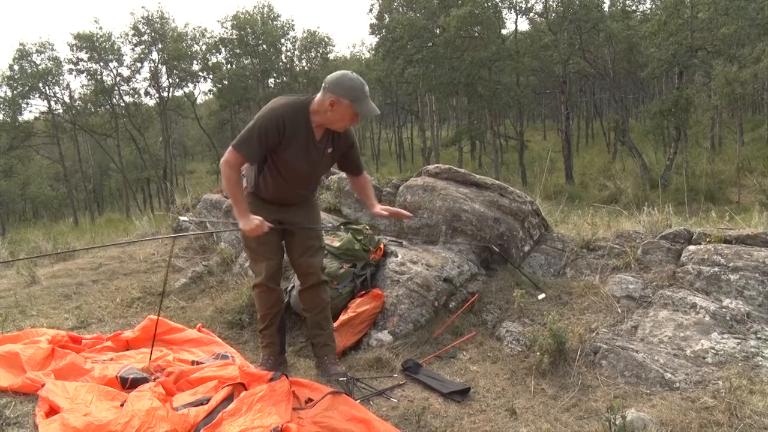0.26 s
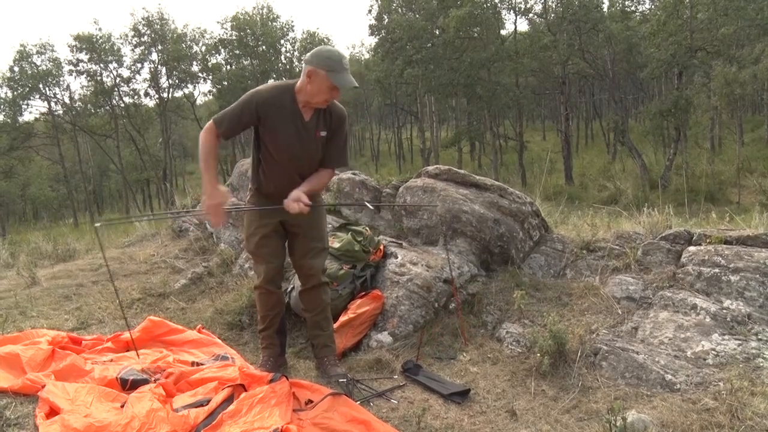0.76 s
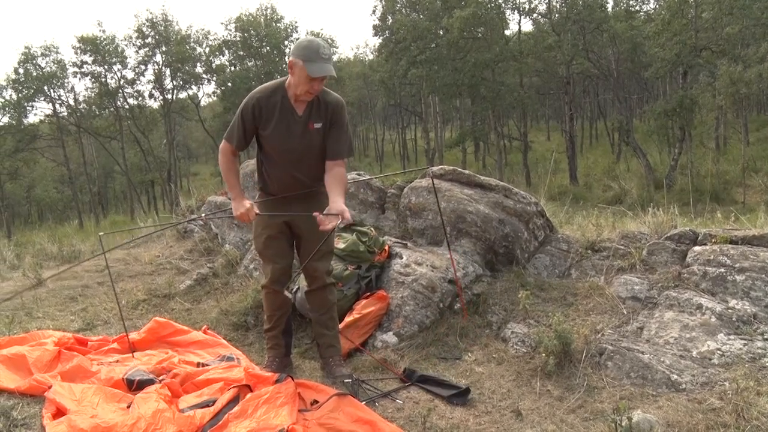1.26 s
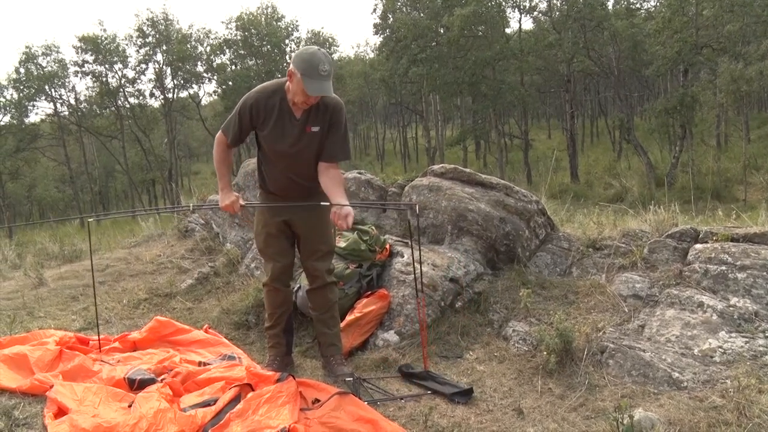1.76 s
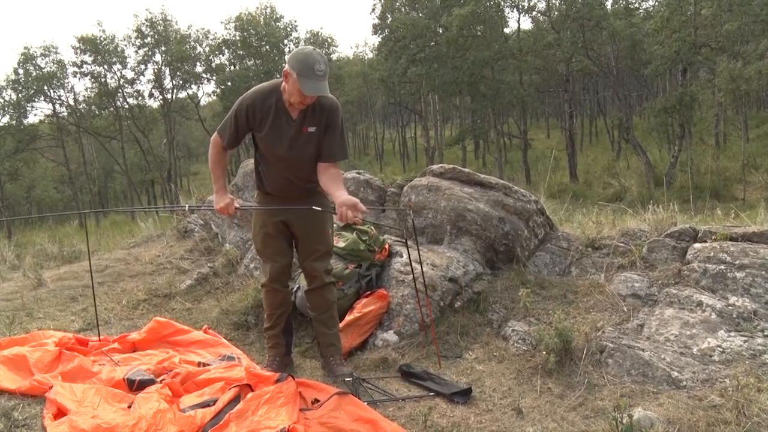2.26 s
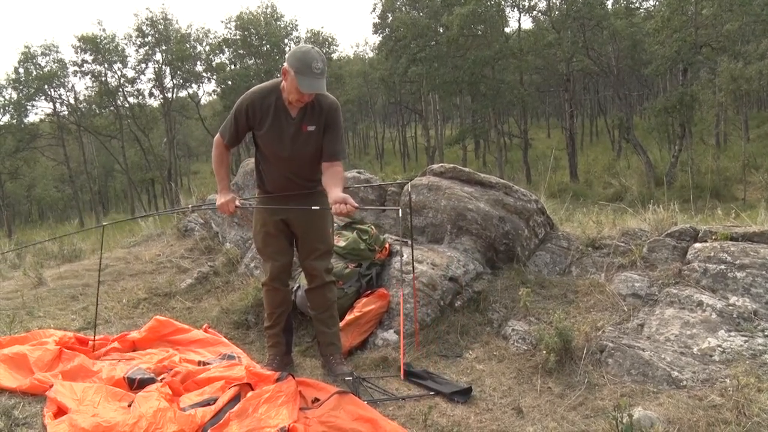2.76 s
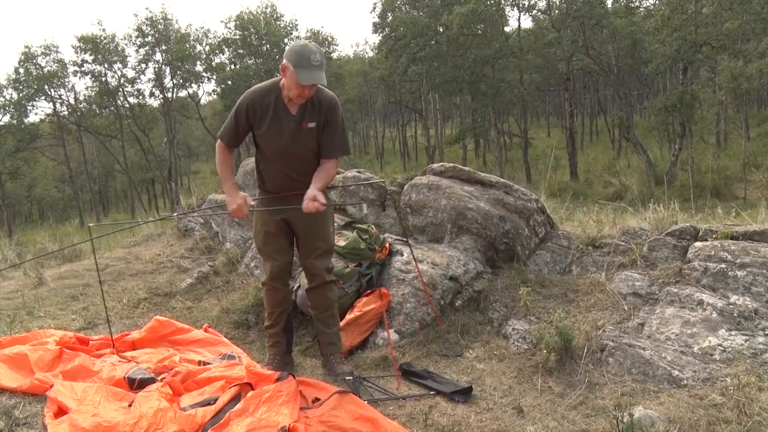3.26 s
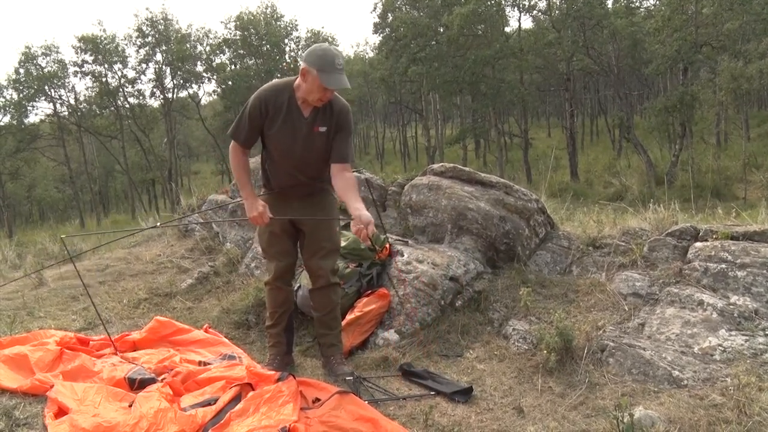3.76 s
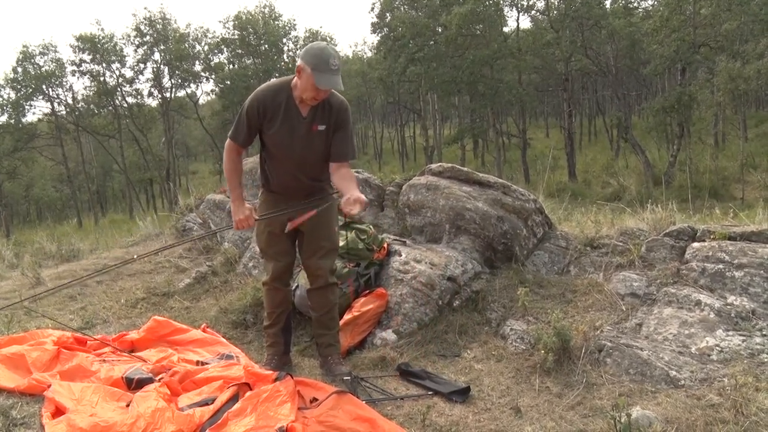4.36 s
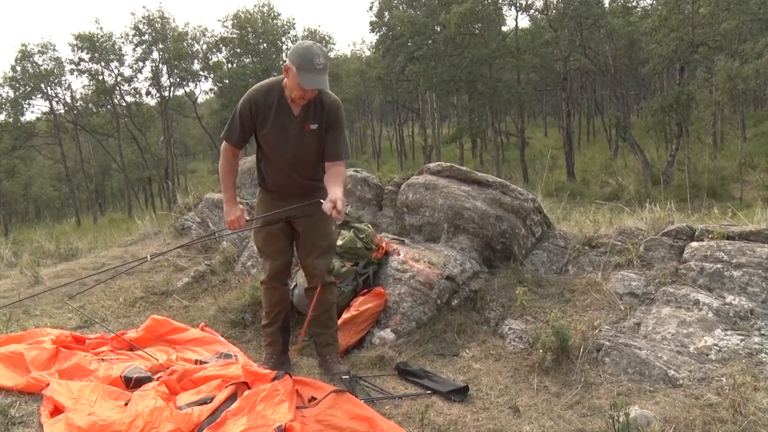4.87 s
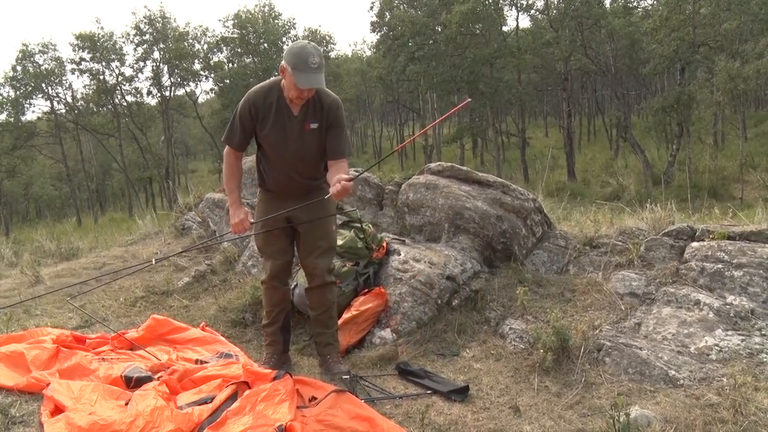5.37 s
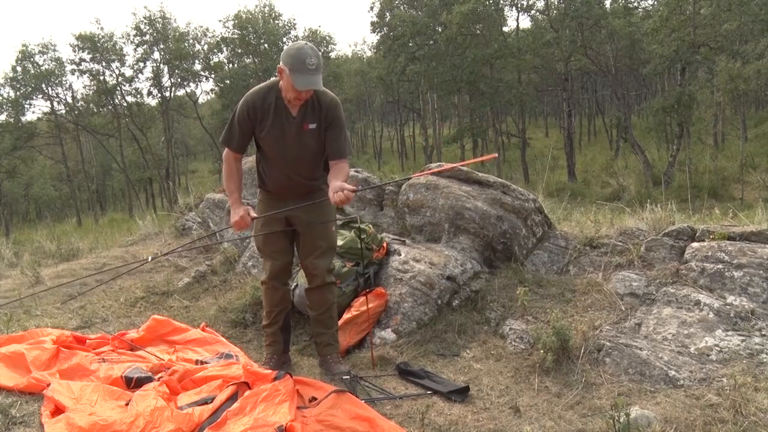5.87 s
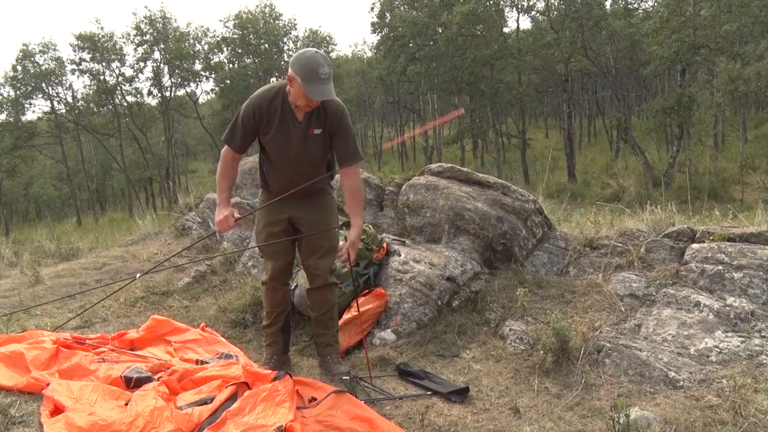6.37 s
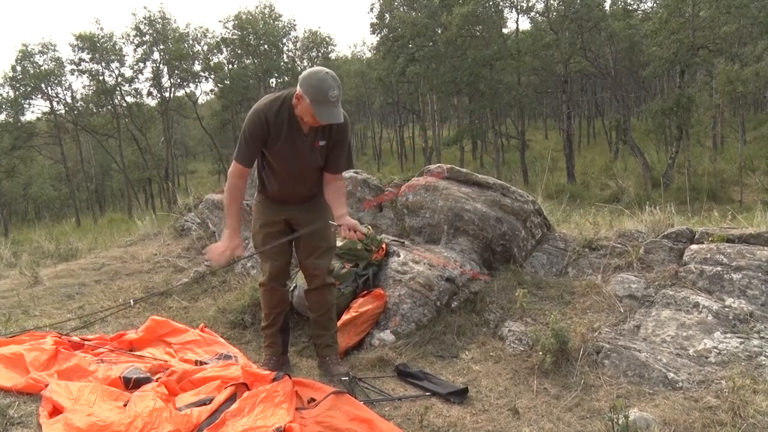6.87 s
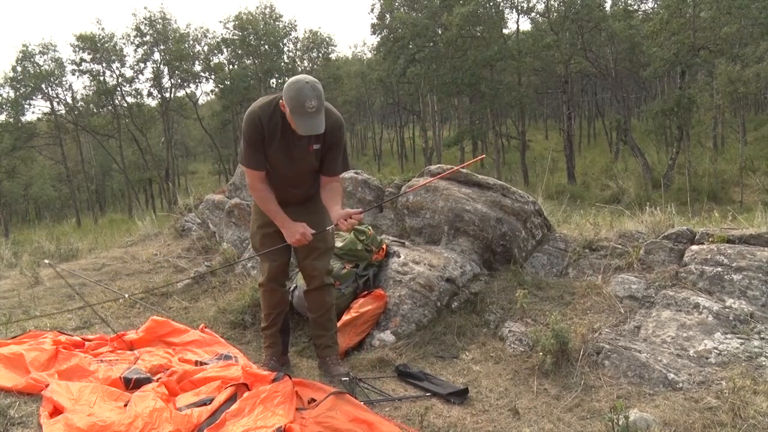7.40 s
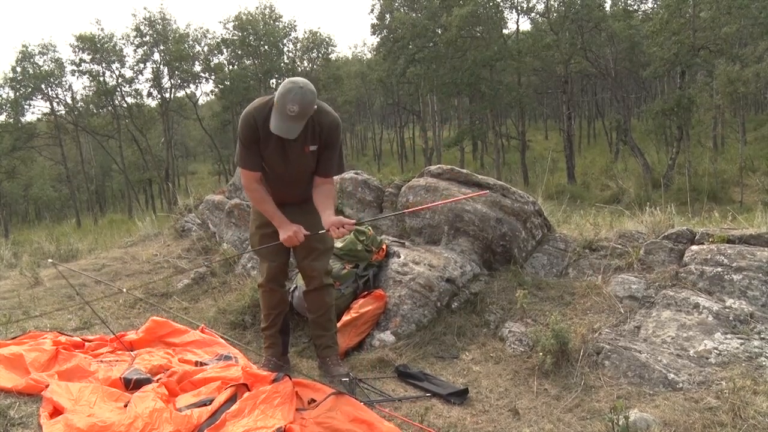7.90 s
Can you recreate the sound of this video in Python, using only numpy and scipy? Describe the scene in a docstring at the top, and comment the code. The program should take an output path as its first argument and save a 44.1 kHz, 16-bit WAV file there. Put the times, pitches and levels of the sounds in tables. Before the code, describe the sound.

Thin metal tent poles click and rattle together in uneven bursts, with close cloth rustle, hand rubs and dull bumps in a quiet outdoor clearing.

```python
"""Thin aluminium tent pole sections click and rattle as they are joined in a quiet clearing.
Each click is a short noise chatter filtered by tube modes, heard direct, off the ground and scattered.
A microphone on the body also picks up dull jolts, grainy scuffs and filtered noise for rustling cloth.
A hand slides along the tube as a resonant rub with thin squeaks, and light catches sound the air inside.
Behind it lie still air, made of shaped noise, and a faint low hum, a wavering sine."""
import sys
import numpy as np
from scipy import signal
from scipy.fft import rfft, irfft
from scipy.io import wavfile
from scipy.ndimage import uniform_filter1d

SR = 44100
rng = np.random.default_rng(int(sys.argv[2]) if len(sys.argv) > 2 else 0)


def materialize(psi):
    """Save the field psi as 16-bit PCM at rate SR to the path in sys.argv[1].

    A 1-D psi becomes a single channel; in a 2-D psi each row is a channel.
    """
    bounded = np.clip(np.atleast_2d(psi).T, -1, 1)
    quanta = np.round(bounded * 32767).astype(np.int16)
    wavfile.write(sys.argv[1], SR, quanta)


N = 358974

# Still air. Each row: frequency in Hz, relative level in dB per Hz.
AIR_SPECTRUM = [(12, -37), (20, -13), (50, -1), (81, 2.5), (181, -9.5), (510, -13.5), (1690, -26),
                (2800, -37), (3400, -41.5), (4630, -28.5), (5620, -40.5), (14500, -31.5), (15800, -29)]
AIR_DB = -65
# Low hum. Each row: time in seconds, pitch in Hz, level in dB before the waver.
HUM_CURVE = [(0, 73.4, -56), (.4, 75.6, -69), (.7, 75.1, -60), (.95, 75.1, -58), (1.3, 73.9, -67.5),
             (2.75, 73.5, -68.5), (3, 73.7, -61.5), (3.599, 74.2, -59.5), (4.601, 73.2, -62.5),
             (5.2, 74.4, -61), (5.7, 73.2, -58.5), (6.9, 72.1, -56), (7.5, 71.2, -57), (7.75, 72.1, -64.5),
             (8.14, 75.2, -57.5)]

# Strokes of arms and hands. Each row: peak time in seconds, rise in seconds, fall in seconds,
# cloth on the microphone in dB, hand on the tube in dB, crisp rustle in dB.
STROKES_OF_ARMS = [(.107, 0.27, 0.1, -58.5, -58.5, -50.5), (.307, 0.59, 0.34, -59.5, -70.5, -69),
                   (.6, 0.29, 0.28, -61, -65.5, -63), (.955, 0.14, 0.22, -58.5, -57.5, -55),
                   (1.06, 0.093, 0.12, -56.5, -59.5, -57), (1.255, 0.19, 0.091, -57, -57, -56),
                   (1.47, 0.25, 0.97, -60.5, -72, -62.5), (1.7, 0.21, 0.05, -79, -59, -59),
                   (1.893, 0.084, 0.054, -62.5, -62, -68), (2.01, 0.027, 0.12, -72, -58, -60),
                   (2.115, 0.1, 0.0092, -71, -60.5, -52.5), (2.42, 0.04, 0.073, -73, -62.5, -70),
                   (2.7, 0.6, 0.9, -68.5, -94.5, -92), (2.782, 0.048, 0.095, -61, -56, -59),
                   (2.956, 0.039, 0.036, -53, -53, -56), (3.04, 0.048, 0.15, -57, -55, -57),
                   (3.235, 0.15, 0.12, -58.5, -61.5, -68), (3.36, 0.2, 0.063, -62, -85, -63),
                   (3.774, 0.21, 0.078, -61.5, -67, -69), (3.993, .1, 0.056, -64, -68, -64),
                   (4.1, 0.57, 0.31, -63, -77, -78), (4.421, 0.35, 0.08, -62, -60.5, -64),
                   (4.722, 0.033, 0.089, -76, -64.5, -67), (4.886, 0.026, 0.034, -58.5, -58.5, -65),
                   (5.25, 1, 0.29, -66.5, -97, -90), (5.925, 0.048, 0.06, -76, -61, -52.5),
                   (5.99, 0.1, 0.23, -65.5, -64.5, -68), (6.24, 0.21, 0.38, -67.5, -67.5, -63),
                   (6.428, 0.085, 0.097, -58.5, -68, -66), (6.731, 0.066, 0.095, -85, -63.5, -60),
                   (7.25, 0.88, 0.15, -64, -68.5, -61), (7.345, 0.037, 0.14, -54.5, -50.5, -52.5),
                   (7.5, 0.051, 0.16, -60, -63.5, -62.5), (7.826, 0.082, 0.075, -62, -63, -62.5),
                   (8.06, 0.11, 0.29, -64, -63, -59)]
# Resting levels between strokes, in dB: cloth, rub and rustle.
REST_LEVELS_DB = (-82.5, -73, -72.5)
STROKE_DROP_DB, STROKE_ROUND = 17, 1.49  # level lost over one rise or fall time; how rounded the top is
# Colours of soft cloth, of the rub on the tube and of the fine rustle.
# Each row: frequency in Hz, relative level in dB per Hz.
CLOTH_SPECTRUM = [(60, -35.5), (110, -4), (280, -6.5), (540, -4), (750, -7.5), (1300, -9), (1800, -13),
                  (3000, -51)]
RUB_SPECTRUM = [(900, -3.5), (1500, -11), (2100, 3), (2450, 1), (2800, 2), (3300, -5), (4400, -5.5),
                (5500, -20.5), (8000, -26.5)]
RUSTLE_SPECTRUM = [(2500, -33), (4500, -1.5), (6000, 3), (10000, 1.5), (15800, 3.5)]

# Clothing dragging over the microphone as the body straightens. Each row: time in seconds, level in dB.
DRAG_LEVEL = [(.045, -50.5), (.1, -48), (.145, -45.5), (.19, -51), (.215, -66)]
# Resonances of the drag. Each row: frequency in Hz, width of each of two passes in Hz, relative level in dB.
DRAG_RESONANCES = [(90, 60, 0.5), (191, 120, -6)]

# Hand sliding along the pole. Each row: time in seconds, level in dB.
SLIDE_LEVEL = [(6.88, -59), (6.95, -61), (7.1, -57), (7.25, -56), (7.4, -59.5), (7.6, -60), (7.78, -60.5),
               (7.86, -94)]
# Resonances of the slide. Each row: frequency in Hz, width of the first pass in Hz, relative level in dB.
SLIDE_RESONANCES = [(310, 154, 6), (387, 38, 0), (670, 150, 1), (872, 52, 3), (1500, 640, -10),
                    (6200, 1800, -18)]
# Thin wavering squeaks of skin on the tube, one table each.
# Each row: time in seconds, pitch in Hz, level in dB.
SQUEAK_CURVES = [
    [(4.992, 5060, -63), (5.005, 5130, -66), (5.025, 4970, -80)],
    [(6.928, 11000, -72), (6.945, 13100, -71), (6.97, 14100, -71), (6.995, 13700, -71), (7.03, 14700, -72),
     (7.1, 14960, -76)],
    [(7.295, 13000, -70), (7.317, 11900, -69)],
    [(7.375, 14000, -70), (7.415, 13900, -70), (7.432, 12400, -69), (7.458, 12900, -68), (7.48, 11800, -78)],
    [(7.5, 13200, -76), (7.526, 12760, -73), (7.544, 11870, -73), (7.568, 12850, -73), (7.605, 12700, -72),
     (7.645, 11250, -74), (7.694, 11400, -73), (7.728, 10780, -72), (7.745, 11240, -71), (7.778, 9950, -74)],
]
# A fainter tone at two thirds of the pitch comes out when a high squeak sinks below this.
LOWER_DB, LOWER_BELOW_HZ = -2, 11500

# Soft scuffs of hand, cloth and cord. Each row: start in seconds, peak in dB, centre in Hz,
# spread in octaves, length in ms.
SCUFF_EVENTS = [(0.122, -29, 3020, 1.8, 16), (0.3028, -41, 1730, 0.69, 23), (0.5964, -39.5, 4390, 2.4, 10),
                (0.8032, -44, 8960, 2, 33), (0.9648, -38, 3940, 1.3, 5.4), (1.171, -43, 12900, 0.72, 7.3),
                (3.112, -39, 4860, 1.2, 9.8), (3.1606, -44, 2730, 1.5, 22), (3.2218, -47.5, 2590, 1.3, 19),
                (3.778, -42, 9240, 1.5, 13), (3.977, -40, 10000, 1.5, 14), (4.253, -50, 1790, 2.8, 17),
                (4.326, -48, 2810, 1.03, 13), (5.3104, -49.5, 2630, 2.4, 2.9),
                (6.101, -43.5, 2680, 2.1, 10), (6.2512, -41, 11700, 1.5, 8.4),
                (7.214, -46.5, 2500, 0.36, 6), (7.2953, -44, 2200, 0.39, 5.6),
                (7.3265, -26.5, 6960, 1.9, 10), (7.3385, -32, 4500, 1.1, 6.3), (7.347, -40, 8000, 1.5, 4),
                (7.357, -40, 5500, 0.86, 6), (7.3695, -35, 7540, 0.7, 10), (7.3934, -34.5, 10400, 2.5, 9.8),
                (7.4235, -36, 7000, 1.4, 7.1), (7.437, -39, 5000, 1.2, 7), (7.4906, -40.5, 2040, 3, 8.9),
                (7.5958, -45, 4670, 1.5, 11), (7.834, -41, 14800, 0.48, 6)]

# Jolts through arm and clothing into the microphone. Each row: start in seconds, swing peak in dB,
# push in ms (never under 0.5), wobble in Hz, wobble in dB against the swing.
JOLT_EVENTS = [(0.039, -35, 1.4, 128, -10), (.148, -38, 2, 82, 5.5), (.519, -36.5, 1.26, 110, -6),
               (1.444, -21, 1.1, 384, -3), (1.975, -45.5, 2.2, 197, -4), (3.077, -29, 0.42, 714, 10.5),
               (3.744, -29, 0.42, 520, -8.5), (3.941, -24, 1.55, 507, -2), (5.945, -37, 0.82, 396, -6),
               (7.319, -40, 0.86, 438, 12.5), (7.3255, -51, 0.85, 330, 3), (8.068, -27, 0.8, 417, -11)]

# Light catches that sound the air inside one section. Each row: start in seconds, peak in dB,
# favoured overtone in Hz, spread in Hz.
CATCH_EVENTS = [(3.63, -53, 3000, 2500), (3.6535, -53, 2420, 400), (3.672, -50, 4200, 2500),
                (3.689, -46, 2900, 1500), (3.707, -51, 3800, 1500), (3.727, -51, 3600, 1500),
                (3.75, -31, 2810, 1600), (3.806, -51, 1830, 300)]
# Tones of the air in one section, in Hz.
AIR_COLUMN_HZ = [1910, 2380, 2990, 3700, 4160, 5060, 5470, 5900, 6510]
PIPE_T60_S = 0.08  # at the second tone; higher tones die sooner

# Pole clicks. Each row: start in seconds, peak in dB, favoured ring or rings in Hz,
# brightness in dB per octave, low knock in dB, ground echo in dB (reached in the treble).
CLICK_EVENTS = [(0.5194, -41, 3360, -0.5, 13, 5), (0.543, -34, 3800, -3, -47, 2),
                (0.6754, -33, 2740, -6.5, -35, -18), (0.7208, -42.5, 5860, -7.5, -50, -15),
                (0.822, -37, 9000, -2, -28, 1), (1.4428, -10.5, (12270, 8800, 1600, 6500), -2.5, 0, -6),
                (1.5139, -25, (10900, 9300, 4950, 7800), 0.5, 2, -1.5),
                (1.565, -24.5, (2900, 6460, 4480, 8200), -0.5, 2, -23), (1.593, -33, (5000, 3100, 5900),
                0, 5, -16), (1.674, -32, 8230, -8, -19, -21),
                (1.68, -16.5, (10300, 8340, 3100, 4930, 12300), 1.5, 4, -23),
                (1.7215, -43.5, 2900, -4, -12, -8), (1.7634, -19.5, (9900, 3300, 4770, 12000, 13900, 2150),
                3.5, 4, -6), (1.801, -22, (5170, 3180, 12860, 8550, 1210), 1.5, 2.5, -5),
                (1.9739, -19, (3200, 11250, 15300, 5240, 7500), 0, 3, -1.5), (1.9942, -46, (4900, 7000),
                -6, -12, -14), (2.0185, -31.5, (3260, 8790, 13800, 4970), 2, -11, -5),
                (2.0542, -18.5, (7300, 5300, 9950, 12500), -2.5, -9, -7), (2.0861, -25, (4850, 8600, 3300),
                -1, -45, -18), (2.542, -36, 2740, -2, -33, 3), (2.873, -48, 2700, -7, -8, -8),
                (3.076, -9.5, (12600, 3600, 2240, 3000, 4850, 7300), 0.5, -3.5, -26),
                (3.0925, -26.5, 6390, 2.5, -17, -2), (3.3436, -44, 3220, 2, -14, -14),
                (3.4195, -49, 7160, 6.5, -23, -6), (3.6266, -31.5, (4500, 12700, 14600), -3.5, -19, -5),
                (3.7424, -14, (2410, 4840, 8700), 5, 10, -5), (3.7453, -9, (13400, 11000, 14100),
                -1.5, -7, -4.5), (3.9407, -9, (14800, 8000, 4620, 1300, 2800), 2, 4, -5.5),
                (4.0033, -43, 2940, 2, -1, -11), (4.3786, -34, 1980, -3, -11, -22),
                (4.6113, -40.5, 3700, -1.5, 11.5, -15), (4.75, -32.5, (12250, 6200, 7500), -0.5, 2, -16),
                (4.8695, -47, 4700, -7, -3, -11), (4.971, -48.5, 2650, -3, 7, -11),
                (5.4842, -25, (3150, 6840, 3730, 9700), -8, -9, -29),
                (5.5988, -22, (3020, 2620, 3440, 6330, 9360), -8.5, -7.5, -9),
                (5.8993, -34.5, 2830, -4, -34.5, -12), (5.9454, -10, (4180, 10300, 6500, 9200),
                -2.5, 2.5, -9.5), (6.2317, -42.5, 9100, 1, -18, -7), (6.92, -47.5, 4300, -6, -10, -14),
                (7.1918, -35, (6000, 9700), -1.5, 6, -21), (7.3184, -30, (4260, 5700, 10000), -1.5, -12, 3),
                (7.5228, -30, (2780, 6400, 10000, 12600), -6.5, -9, -7),
                (8.0683, -11.5, (4130, 14300, 12130, 9060, 6730), -1.5, 4, -3.5)]
# Modes of the tube. Each row: frequency in Hz, width in Hz, level in dB relative to the other modes.
TUBE_MODES = [(2380, 550, 1), (2900, 880, 4.5), (4220, 550, 4), (4840, 250, 5), (7370, 2500, 3),
              (10300, 3500, 11), (12500, 1100, 7), (14400, 350, 16)]
# The bare tick of metal on metal. Each row: frequency in Hz, level in dB.
TICK_SPECTRUM = [(150, -24), (600, -34), (1000, -15.5), (1500, -14), (2500, -6.5), (6000, -6), (13000, -18),
                 (16500, -57.5)]
# Scatter from grass, rocks and body. Each row: frequency in Hz, 60 dB decay in seconds before damping.
SCATTER_DECAY = [(500, 0.047), (1300, 0.051), (3500, 0.069), (9000, 0.049), (16000, 0.041)]
GROUND_MS = 5.2  # extra path by way of the ground
RING_DB = 9  # lift of a favoured ring
RING_WIDTH_HZ, RING_WIDENS = 300, 0.25  # ring width at 3 kHz; how it grows with pitch
# Scatter against the click at 0 dB; fainter clicks are farther and wetter (dB per dB).
SCATTER_DB, SCATTER_SLOPE = -33, -0.3
SCATTER_PER_BRIGHT = 0.53  # dull, damped clicks scatter less (dB per dB of brightness)
DAMPING = 44  # dull clicks, held in the hand, also fade sooner (dB a second per dB of brightness)

EDGE_HZ = 15850  # upper band limit


def gain_of(db):
    """Decibels to amplitude."""
    return 10 ** (np.asarray(db) / 20)


def evened(x):
    """Scales x to rms 1."""
    return x / np.sqrt(np.mean(x ** 2) + 1e-20)


def read(points, hz):
    """Reads a table at hz, along a logarithmic pitch axis."""
    f, value = np.transpose(points)
    return np.interp(np.log(hz + 1), np.log(f + 1), value)


def along(rows):
    """Start time and the columns of a curve table at sample rate."""
    s, *columns = np.transpose(rows)
    t = np.arange(s[0], s[-1], 1 / SR)
    return s[0], [np.interp(t, s, c) for c in columns]


def add(mix, s, sound):
    """Lays a sound into the mix at s seconds, cut off at the end."""
    part = mix[round(s * SR):][:len(sound)]
    part += sound[:len(part)]


def place(events, sound):
    """One layer: each row gives a start time and the settings of one sound."""
    out = np.zeros(N)
    for s, *settings in events:
        add(out, s, sound(*settings))
    return out


def smoothed_twice(x, size, axis=-1):
    """Two running means in a row."""
    return uniform_filter1d(uniform_filter1d(x, size, axis=axis), size, axis=axis)


def resonate(x, hz, width):
    """Shifts hz down to zero, smooths, and shifts back: a resonance of gain 1."""
    turn = np.exp(2j * np.pi * np.cumsum(hz * np.ones(len(x))) / SR)
    r = np.exp(-np.pi * width / SR)
    return 2 * (turn * signal.lfilter([1 - r], [1, -r], x / turn)).real


def resonant_body(x, resonances, second_width):
    """Sums resonances of two passes each; second_width scales the width of the second pass."""
    return sum(gain_of(level) * resonate(resonate(x, f, w), f, second_width * w)
               for f, w, level in resonances)


def coloured(x, spectrum, patchy_db):
    """Filters x by a spectrum with brief wide patches; rms 1."""
    hz, _, z = signal.stft(x, SR, nperseg=512, noverlap=384)
    patches = uniform_filter1d(rng.standard_normal(z.shape), size=24, axis=0)
    patches = evened(uniform_filter1d(patches, size=7, axis=1))
    z = z * gain_of(read(spectrum, hz)[:, None] + patchy_db * patches)
    return evened(signal.istft(z, SR, nperseg=512, noverlap=384)[1][:len(x)])


def grains(per_s, spread_db, hiss):
    """Sparse ticks of uneven size over a share of steady hiss."""
    ticks = rng.standard_normal(N) * gain_of(spread_db * np.minimum(rng.exponential(1, N), 4))
    return evened(ticks * (rng.random(N) < per_s / SR)) + hiss * rng.standard_normal(N)


def outdoors():
    """Still air and a low hum that wavers slightly."""
    s, hz, db = np.transpose(HUM_CURVE)
    t = np.arange(N) / SR
    waver_db = evened(smoothed_twice(rng.standard_normal(N), 3000))
    hum = np.sqrt(2) * np.sin(2 * np.pi * np.cumsum(np.interp(t, s, hz)) / SR)
    air = coloured(rng.standard_normal(N), AIR_SPECTRUM, patchy_db=0.8)
    return gain_of(np.interp(t, s, db) + waver_db) * hum + gain_of(AIR_DB) * air


def strokes():
    """Levels of cloth, rub and rustle: each stroke swells to its peak and falls away over a resting level."""
    t = np.arange(0, N / SR + 0.01, 0.002)
    peak, rise, fall, *db = np.transpose(STROKES_OF_ARMS)[:, :, None]
    away = np.where(t < peak, (peak - t) / rise, (t - peak) / fall)
    stroke_db = np.array(db) - STROKE_DROP_DB * away ** STROKE_ROUND
    rest_power = gain_of(2 * np.array(REST_LEVELS_DB))[:, None]
    power = gain_of(2 * stroke_db).sum(1) + rest_power
    return [np.interp(np.arange(N) / SR, t, np.sqrt(p)) for p in power]


def clothing():
    """Soft brushing, a rub that sounds the tube and a fine rustle follow the strokes."""
    cloth = coloured(grains(per_s=2500, spread_db=2, hiss=1.5), CLOTH_SPECTRUM, patchy_db=1.4)
    slips = grains(per_s=1200, spread_db=2.6, hiss=1.25)  # the same small slips feed rub and rustle
    rub = coloured(slips, RUB_SPECTRUM, patchy_db=2.2)
    rustle = coloured(slips, RUSTLE_SPECTRUM, patchy_db=2)
    return sum(level * x for level, x in zip(strokes(), [cloth, rub, rustle]))


def drag():
    """Cloth dragging over the microphone: a low uneven rumble of resonant noise."""
    out = np.zeros(N)
    s, (db,) = along(DRAG_LEVEL)
    body = resonant_body(rng.standard_normal(len(db)), DRAG_RESONANCES, second_width=1)
    add(out, s, gain_of(db) * evened(body) * signal.windows.tukey(len(db), 0.1))
    return out


def slide():
    """Skin drags on the tube: friction noise through resonances gives a dull rub."""
    out = np.zeros(N)
    s, (db,) = along(SLIDE_LEVEL)
    body = resonant_body(rng.standard_normal(len(db)), SLIDE_RESONANCES, second_width=1.7)
    add(out, s, gain_of(db) * evened(body) * signal.windows.tukey(len(db), 0.15))
    return out


def squeaks():
    """Skin squeaks on the tube: a gliding sine with a narrow noise around it."""
    out = np.zeros(N)
    for rows in SQUEAK_CURVES:
        s, (hz, db) = along(rows)
        pitch = uniform_filter1d(hz, size=250, mode="nearest")
        phase = 2 * np.pi * np.cumsum(pitch) / SR
        narrow_noise = evened(resonate(rng.standard_normal(len(hz)), pitch, 200))
        lower_share = np.clip((LOWER_BELOW_HZ - pitch) / 400, 0, 1) * (pitch > 9000)
        lower = lower_share * gain_of(LOWER_DB) * np.sin(phase * 2 / 3)
        thin = np.sin(phase) + 0.45 * narrow_noise + lower
        add(out, s, gain_of(db) * evened(thin) * signal.windows.tukey(len(hz), 0.1))
    return out


def scuff(db, centre_hz, octaves, length_ms):
    """A grainy puff of friction around one pitch region."""
    t, hz = np.arange(4096) / SR, np.fft.rfftfreq(4096, 1 / SR)
    fine, grain = rng.standard_normal((2, 4096))
    distance = np.log2((hz + 1) / centre_hz) / np.clip(octaves, 0.1, 5)
    band = gain_of(np.maximum(-6 * distance ** 2, -26)) * hz / (hz + 900)
    grainy = fine * gain_of(1.94 * evened(uniform_filter1d(grain, size=40)))
    rubbed = evened(irfft(rfft(grainy) * band))
    u = t * 1000 / np.clip(length_ms, 1, 30)
    puff = rubbed * np.tanh(6.2 * u) * np.exp(-u ** 2)
    return gain_of(db) * puff / abs(puff).max()


def jolt(db, push_ms, wobble_hz, wobble_db):
    """One soft push, swung back by the microphone's bass cut; the loose mount wobbles after it."""
    t = np.arange(4000) / SR
    u = t * 1000 / np.clip(push_ms, 0.5, 20)
    bass_cut = signal.butter(2, 52, "high", fs=SR)
    swing = signal.lfilter(*bass_cut, u ** 2 * np.exp(-2 * u))
    wobble = np.sin(2 * np.pi * wobble_hz * t) * np.exp(-t * wobble_hz / 0.64)
    return gain_of(db) * (swing / abs(swing).max() + gain_of(wobble_db) * wobble)


def catch(db, centre_hz, spread_hz):
    """Overtones of the air column, dying quickly."""
    t, hz = np.arange(5000) / SR, np.array(AIR_COLUMN_HZ)[:, None]
    uneven, phase = rng.random((2, 9, 1))
    level_db = -6 * ((hz - centre_hz) / spread_hz) ** 2 - 3 * uneven
    decay_db = -60 * t / PIPE_T60_S * (hz / AIR_COLUMN_HZ[1]) ** 0.35
    tones = gain_of(level_db + decay_db) * np.sin(2 * np.pi * (hz * t + phase))
    ring = tones.sum(0) * np.minimum(t / 0.0012, 1)
    return gain_of(db) * ring / abs(ring).max()


def mode(hz, f, width):
    """Complex response of one ringing mode, gain 1 at its peak."""
    return 0.5 * width / (0.5 * width + 1j * (hz - f))


def tube(hz, ring_hz, bright_db, knock_db):
    """Response of the struck tube: bare tick and modes, tilted, with favoured rings lifted."""
    modes = sum(gain_of(level) * mode(hz, f, w) for f, w, level in TUBE_MODES)
    body = gain_of(read(TICK_SPECTRUM, hz)) + 0.22 * modes
    tilt_db = bright_db * np.log2(1 + (hz / 3500) ** 2) / 2
    body = body * gain_of(tilt_db + knock_db / (1 + (hz / 1700) ** 4))
    rings = np.reshape(ring_hz, (-1, 1))
    widths = RING_WIDTH_HZ * (rings / 3000) ** RING_WIDENS
    # where the blow lands favours nearby modes
    return body * (1 + gain_of(RING_DB) * mode(hz, rings, widths).sum(0))


def scattered(noise, t, db, bright_db):
    """Spectrum of the diffuse tail: noise that decays at its own rate in each band."""
    f, s, z = signal.stft(noise, SR, nperseg=128)
    z = z * gain_of(-60 * s / read(SCATTER_DECAY, f)[:, None])
    tail = signal.istft(z, SR, nperseg=128)[1][:4096]
    damped = tail * gain_of(DAMPING * min(bright_db, 0) * t)
    level_db = SCATTER_DB + SCATTER_SLOPE * db + SCATTER_PER_BRIGHT * bright_db
    return gain_of(level_db) * rfft(damped * np.clip(t / 0.00043, 0, 1))


def click(db, ring_hz, bright_db, knock_db, echo_db):
    """A short metal chatter rings the tube, returns off the ground and scatters away."""
    t, hz = np.arange(4096) / SR, np.fft.rfftfreq(4096, 1 / SR)
    chatter, noise = rng.standard_normal((2, 2, 4096))
    u = t * 1000 / 1.7
    chatters = rfft(chatter * np.tanh(3 * u) * np.exp(-u ** 1.28))
    # the chatter's spectrum is evened so that the tube's rings set the colour;
    # the second chatter is as roughened by the ground
    blow, bounce = chatters / uniform_filter1d(abs(chatters) ** 2, size=24) ** 0.56
    delay = np.exp(-2j * np.pi * hz * GROUND_MS / 1000)
    ground = gain_of(echo_db) * hz / (hz + 2500) * delay  # grass returns mostly treble
    heard = blow + bounce * ground + blow * scattered(noise[0], t, db, bright_db)
    sound = irfft(tube(hz, ring_hz, bright_db, knock_db) * heard)[:3000]
    return gain_of(db) * sound / abs(sound).max()


def poles():
    """Scuffs, jolts, the air column and the pole clicks."""
    return (place(SCUFF_EVENTS, scuff) + place(JOLT_EVENTS, jolt)
            + place(CATCH_EVENTS, catch) + place(CLICK_EVENTS, click))


def scene():
    """All layers summed to one channel."""
    return (outdoors() + clothing() + drag() + slide() + squeaks() + poles())[None]


def record(dry):
    """The band limit: a steep low-pass."""
    low_pass = signal.firwin(511, EDGE_HZ, window=("kaiser", 9), fs=SR)
    return signal.oaconvolve(dry, low_pass[None], "same")


dry = scene()
out = record(dry)
materialize(out)
```